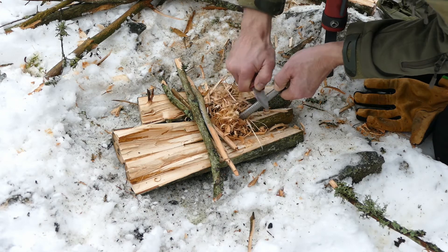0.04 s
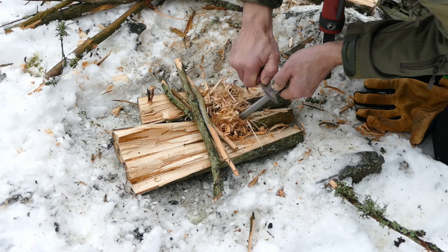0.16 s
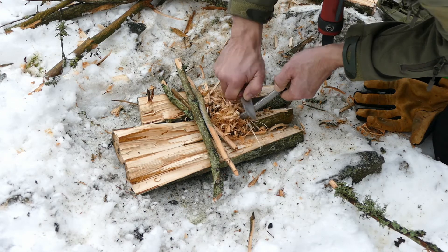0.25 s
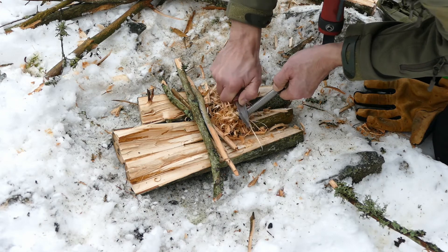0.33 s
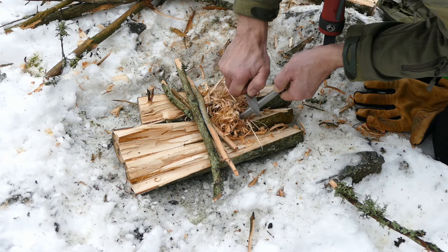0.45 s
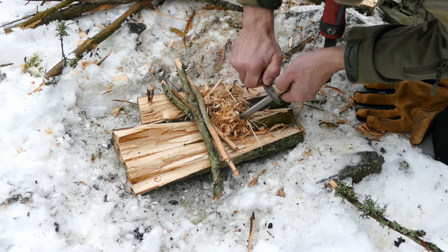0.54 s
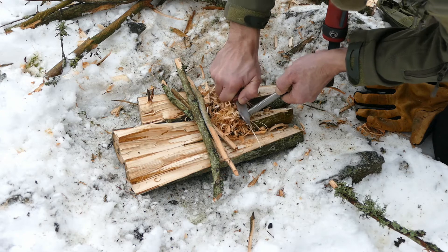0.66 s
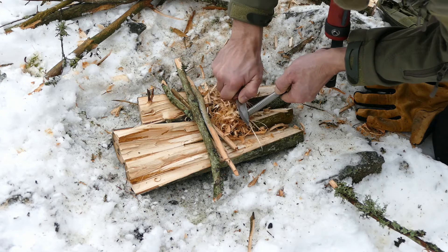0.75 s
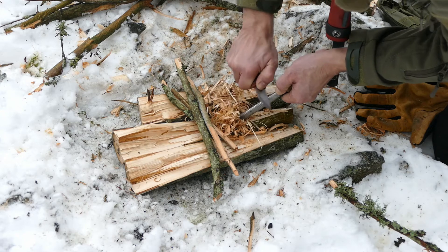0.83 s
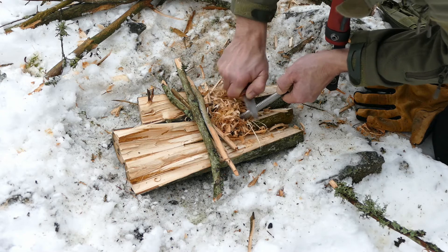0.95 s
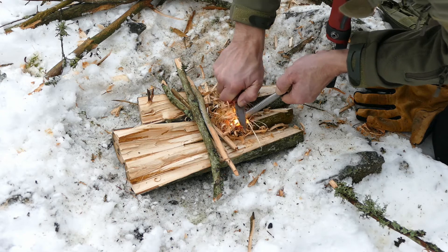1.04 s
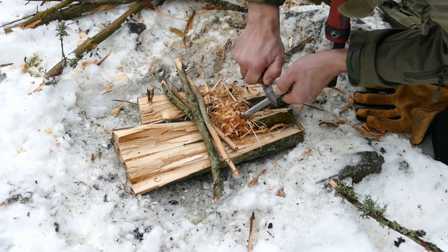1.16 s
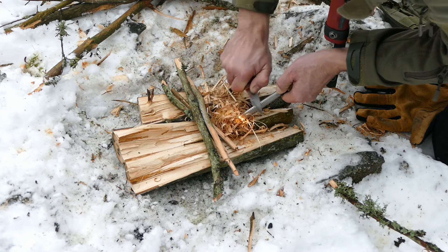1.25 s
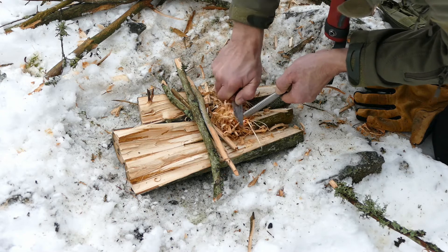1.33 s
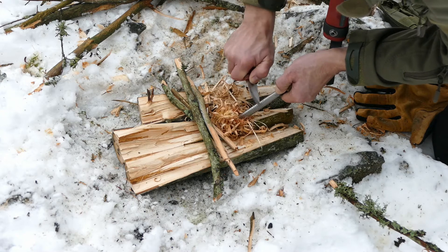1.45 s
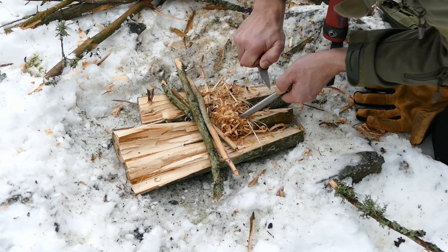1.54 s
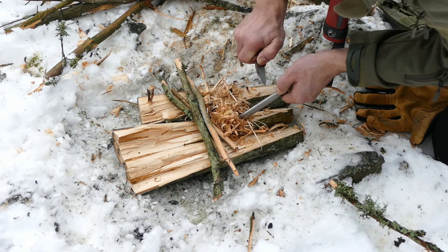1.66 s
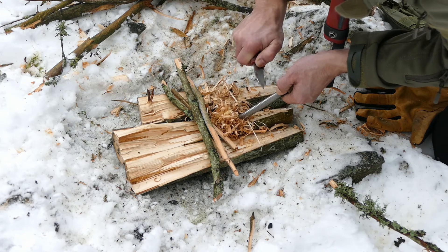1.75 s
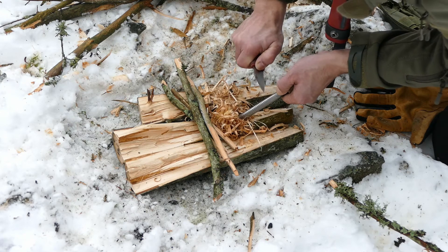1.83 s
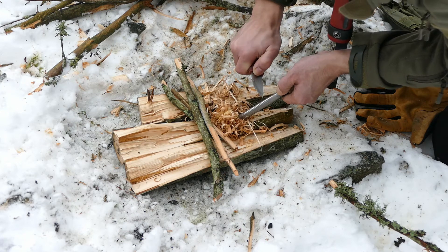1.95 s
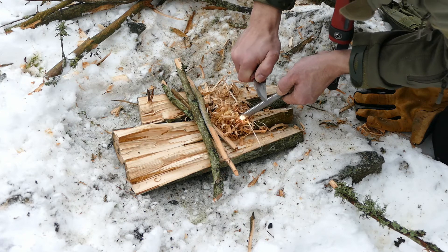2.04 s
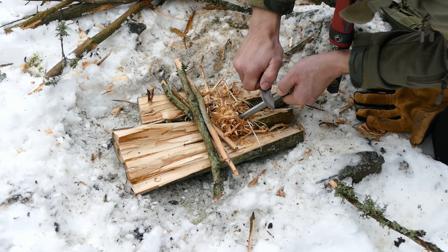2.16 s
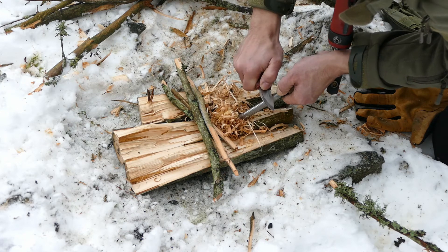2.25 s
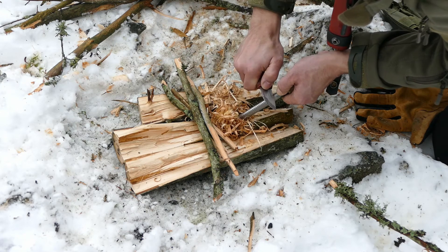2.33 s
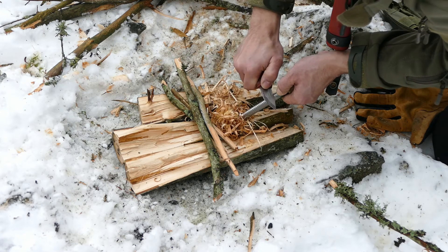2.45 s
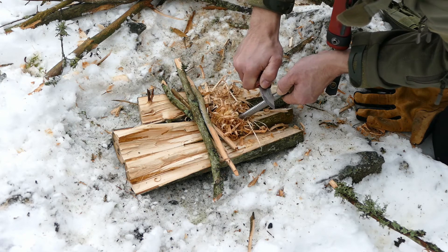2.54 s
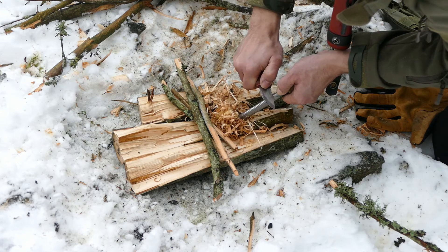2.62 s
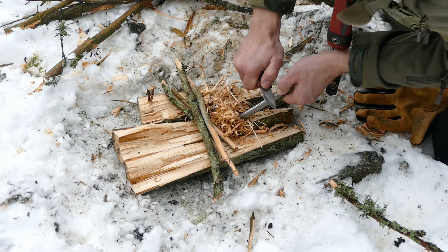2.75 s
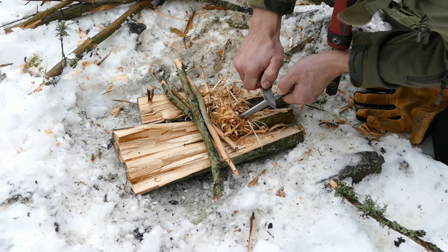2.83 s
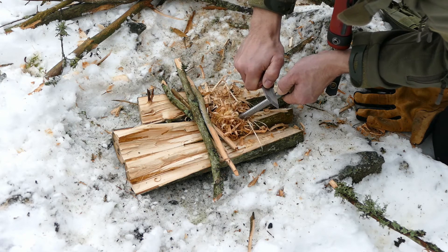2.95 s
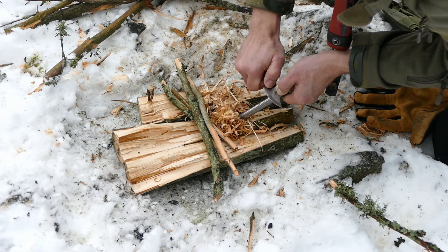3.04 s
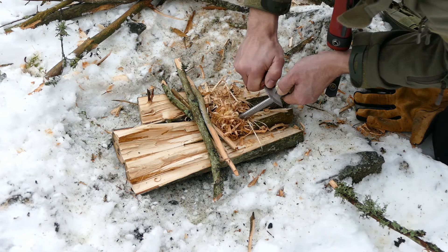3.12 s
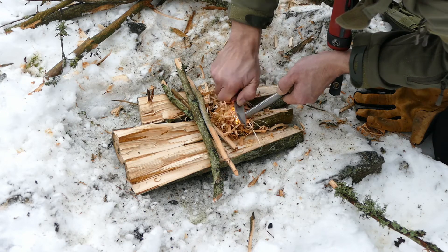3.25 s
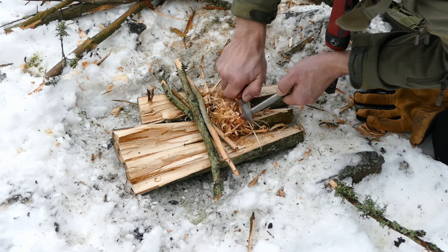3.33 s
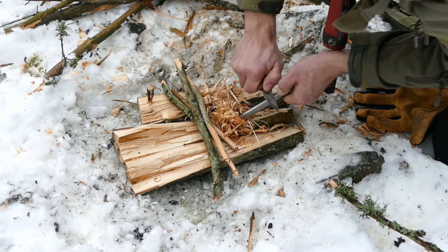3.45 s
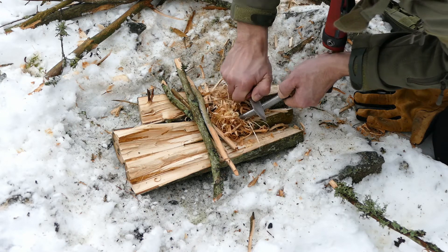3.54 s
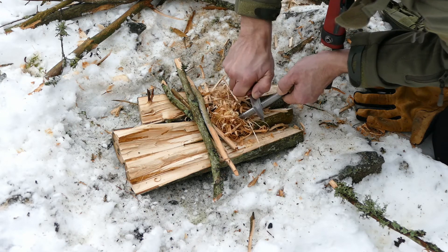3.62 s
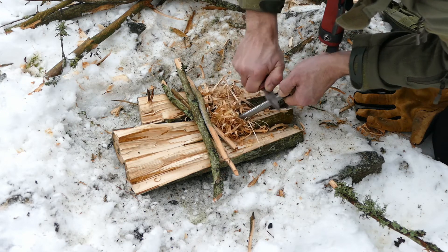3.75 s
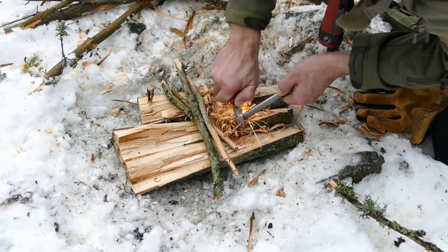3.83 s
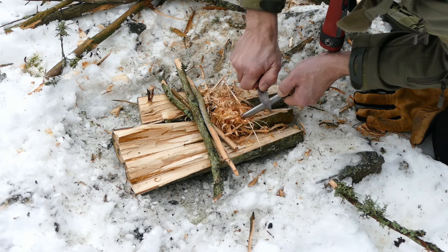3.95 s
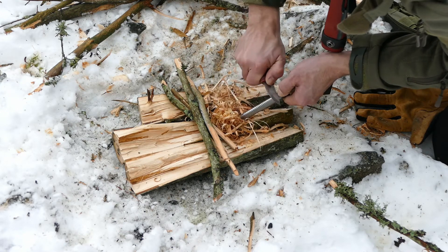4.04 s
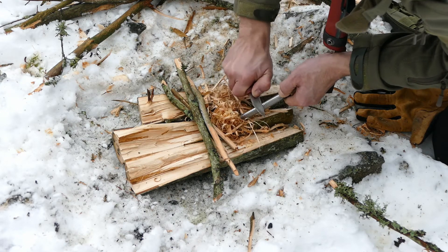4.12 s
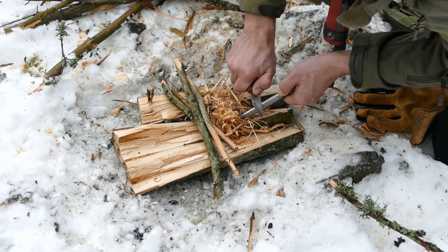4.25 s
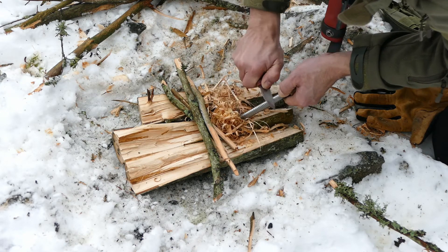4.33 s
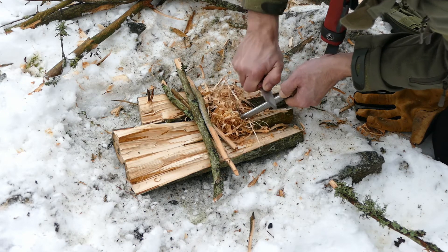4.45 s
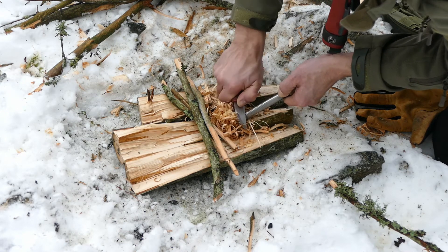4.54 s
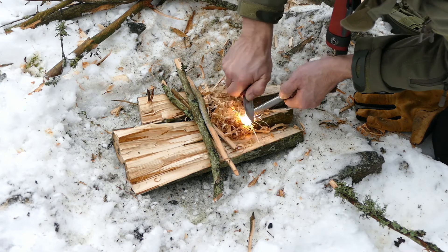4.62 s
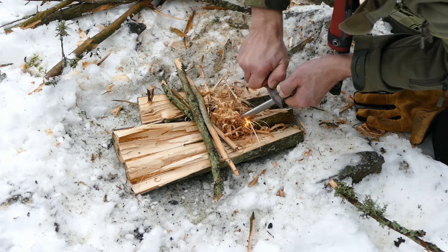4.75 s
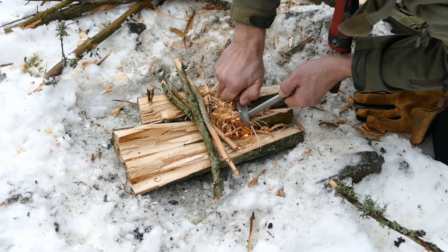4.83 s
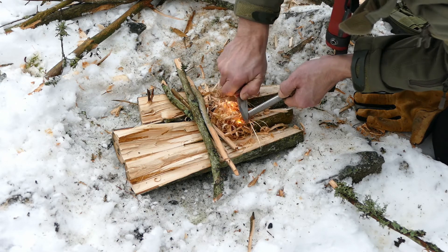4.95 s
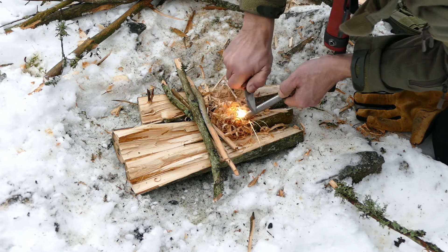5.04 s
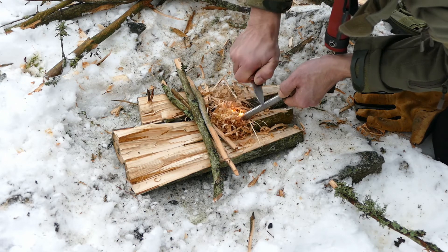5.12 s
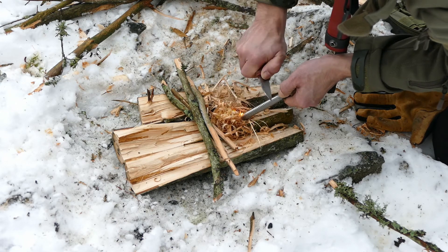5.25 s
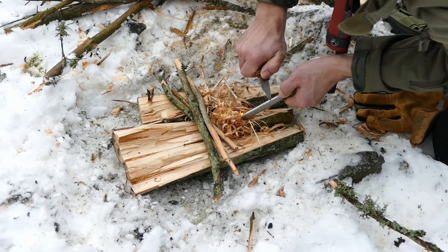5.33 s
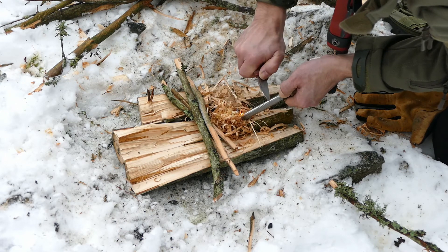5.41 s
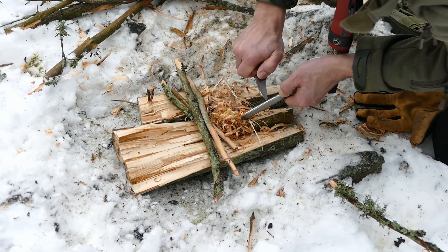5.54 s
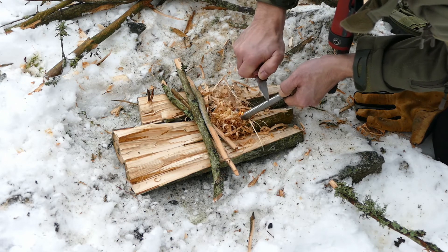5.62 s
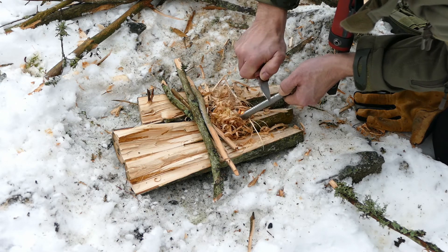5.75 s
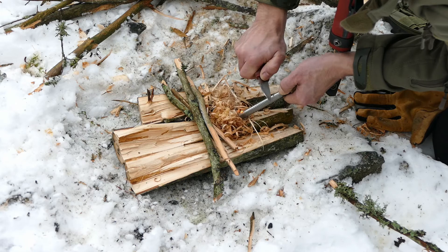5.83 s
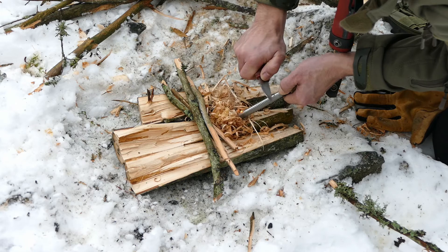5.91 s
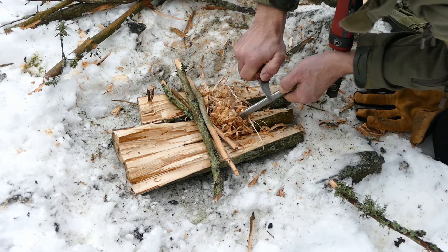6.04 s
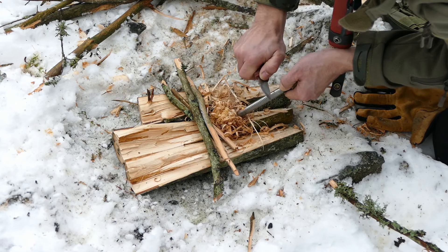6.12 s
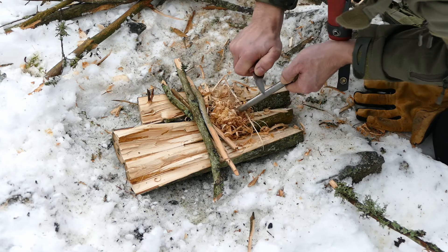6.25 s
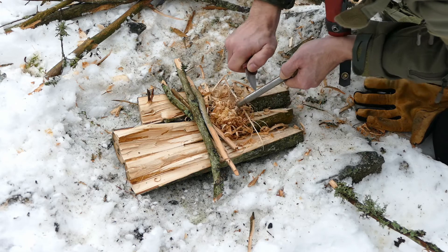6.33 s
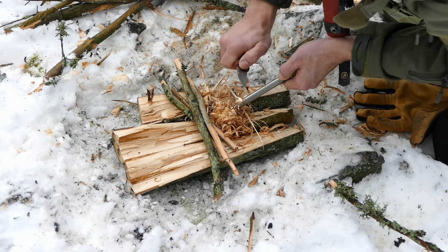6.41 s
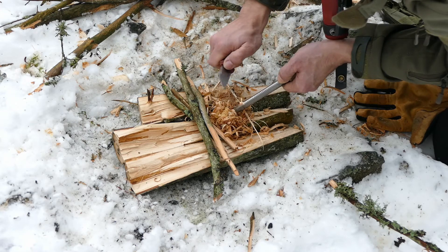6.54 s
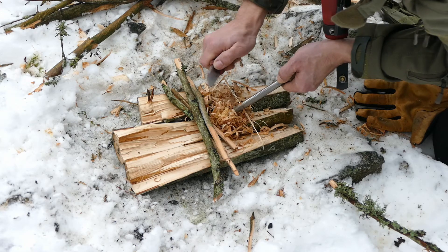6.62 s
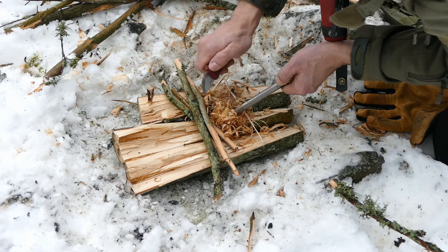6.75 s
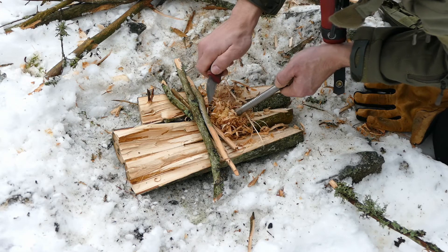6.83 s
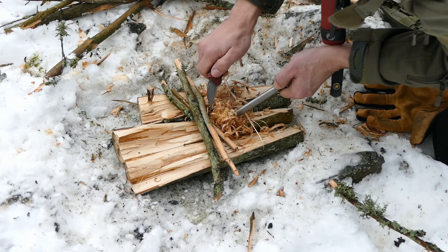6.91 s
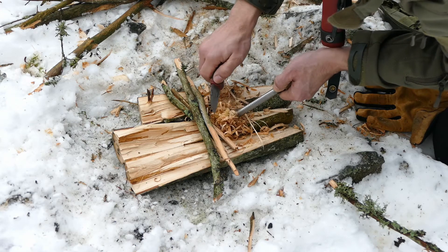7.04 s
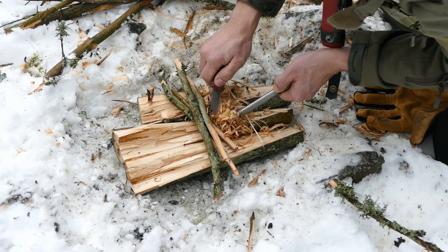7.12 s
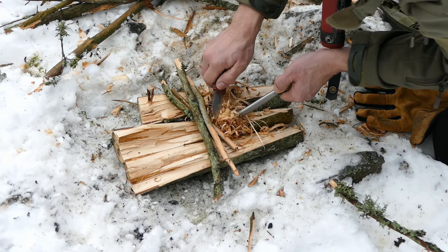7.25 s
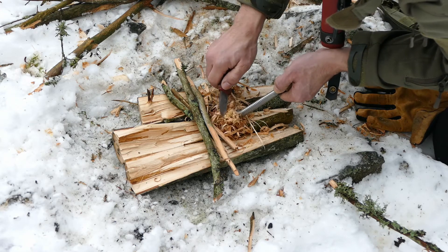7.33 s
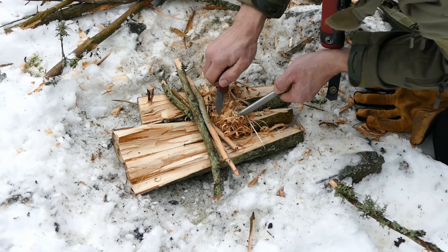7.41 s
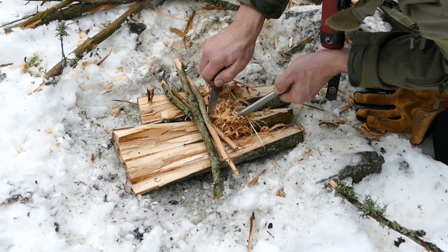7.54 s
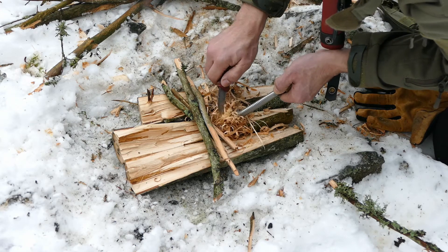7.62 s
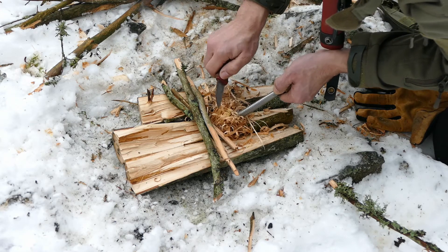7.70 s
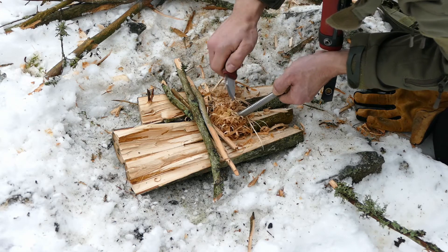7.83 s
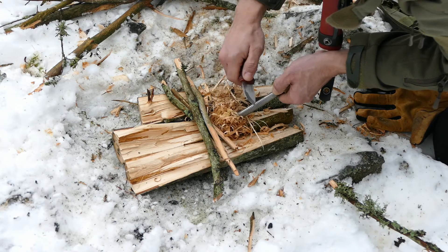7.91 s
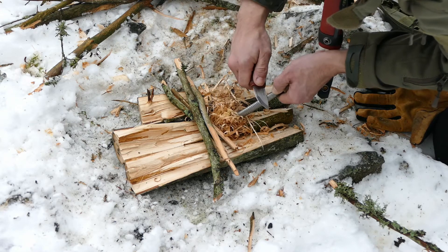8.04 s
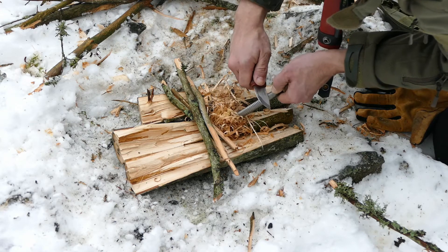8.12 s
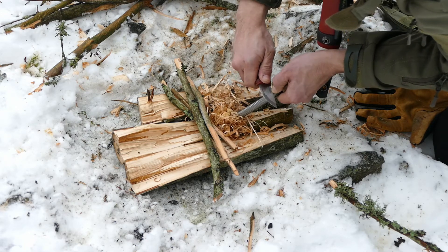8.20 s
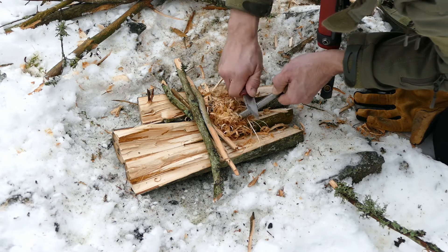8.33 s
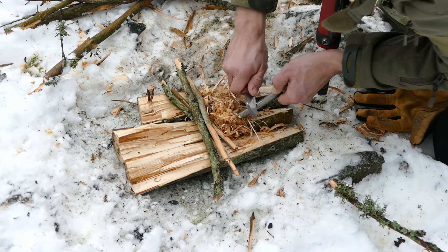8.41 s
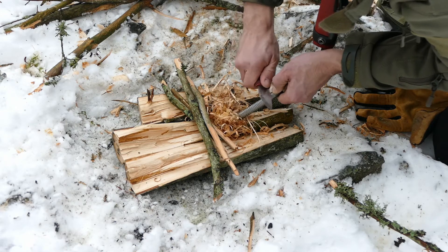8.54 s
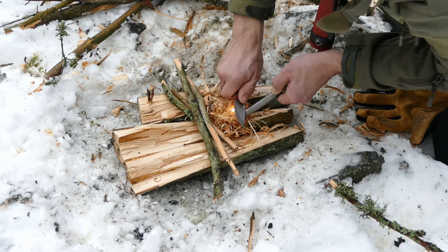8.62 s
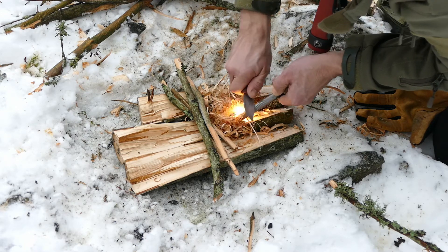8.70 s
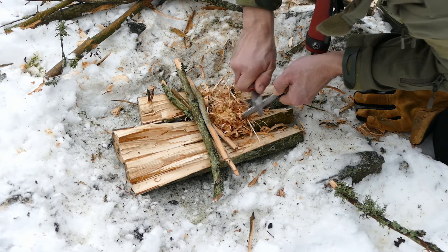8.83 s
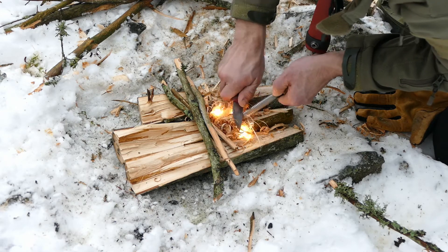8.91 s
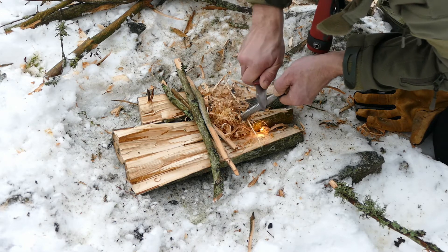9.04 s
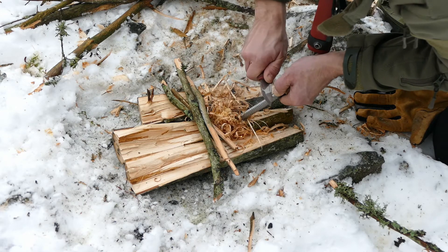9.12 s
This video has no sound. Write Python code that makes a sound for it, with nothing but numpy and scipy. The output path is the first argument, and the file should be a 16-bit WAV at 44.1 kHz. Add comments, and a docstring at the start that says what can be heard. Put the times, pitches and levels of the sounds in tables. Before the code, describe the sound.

A knife scrapes a metal rod in short rasping back-and-forth strokes outdoors, with fizzing sparks, dry shavings rustling and snapping, and pauses between bursts.

```python
"""Outdoors on snow, a knife is scraped back and forth along a ferro rod over dry wood shavings.
In each stroke the edge chatters over ridges in the rod: clicks excite damped modes of rod and blade.
Shaved metal fizzes as filtered random grains; the blade squeaks in wavering tones and taps the rod.
Shavings rustle in grains and snap in decaying noise bursts; a sleeve brushes; the air murmurs far off."""
import sys
import numpy as np
from scipy import signal
from scipy.fft import rfft, irfft
from scipy.io import wavfile
from scipy.ndimage import uniform_filter1d

SR = 44100
rng = np.random.default_rng(int(sys.argv[2]) if len(sys.argv) > 2 else 0)


def unload_audio(sound):
    """Save the sound as a 16-bit wav file, at the path given as the first command line argument."""
    columns = np.transpose(np.atleast_2d(sound))
    # keep every value between -1 and 1, then stretch to whole-number steps
    steps = np.round(np.clip(columns, -1, 1) * 32767)
    wavfile.write(sys.argv[1], SR, steps.astype(np.int16))


N = 404397
TIME = np.arange(N) / SR
STROKE = np.arange(-3528, 4410) / SR  # seconds around one stroke's own time


def undb(db):
    """Decibels to gain."""
    return 10 ** (np.asarray(db) / 20)


def unit(x):
    """Scale to rms 1."""
    return x / np.sqrt(np.mean(x ** 2) + 1e-18)


def add(out, start_s, x):
    """Mix x into out, starting at start_s."""
    i = int(round(start_s * SR))
    x, i = x[max(-i, 0):], max(i, 0)
    out[i:i + len(x)] += x[:len(out) - i]


def band(x, lo_hz, hi_hz, order=2):
    """Butterworth band-pass."""
    edges_hz = [lo_hz, min(hi_hz, SR / 2 - 1)]
    return signal.sosfilt(signal.butter(order, edges_hz, "band", fs=SR, output="sos"), x)


def colour(x, points, size=4096):
    """Minimum-phase filter whose gain passes through the (Hz, dB) points."""
    hz, db = np.transpose(points)
    bins_hz = np.fft.rfftfreq(size, 1 / SR)
    gain = undb(np.interp(np.log(bins_hz + 1), np.log(hz), db))
    # fold the cepstrum onto its causal half
    cepstrum = irfft(np.log(gain))
    cepstrum[1:size // 2] *= 2
    cepstrum[size // 2 + 1:] = 0
    response = irfft(np.exp(rfft(cepstrum)))[:size // 2]
    return signal.fftconvolve(x, response)[:len(x)]


def ring(x, hz, width_hz):
    """One damped mode, gain near 1 at its centre, high-passed because it radiates little far below it."""
    r, w = np.exp(-np.pi * width_hz / SR), 2 * np.pi * hz / SR
    y = signal.lfilter([2 * (1 - r) * np.sin(w)], [1, -2 * r * np.cos(w), r * r], x)
    return signal.lfilter([1, -1], [1, -np.exp(-w / 2)], y)


def slide(x, hz, width_hz):
    """A resonance whose centre moves with hz."""
    turn, r = np.exp(2j * np.pi * np.cumsum(hz) / SR), np.exp(-np.pi * width_hz / SR)
    return (turn * signal.lfilter([1 - r], [1, -r], x / turn)).imag


def walk(rate_hz):
    """Random wander of rms 1, heading for a new value rate_hz times per second."""
    k = int(SR / rate_hz)
    steps = np.repeat(rng.standard_normal(N // k + 1), k)
    return unit(uniform_filter1d(steps, k)[:N])


def swell(start_s, length_s, db, attack_s, slope_db_per_s, release_s):
    """Gain that climbs 20 dB per attack_s up to db at start_s, drifts, then drops 20 dB per release_s."""
    t = TIME - start_s
    ramps = np.maximum(-t, 0) / attack_s + np.maximum(t - length_s, 0) / release_s
    return undb(db + slope_db_per_s * np.clip(t, 0, length_s) - 20 * np.minimum(ramps, 10))


def crackle(points, grains_per_s, spread_db, smooth_db, patchy_db):
    """Tiny clicks of very uneven size over a smooth hiss, in wandering patches."""
    sizes = undb(spread_db * np.minimum(rng.exponential(size=N), 4))
    grains = (rng.random(N) < grains_per_s / SR) * sizes * rng.choice([-1, 1], N)
    hiss = undb(smooth_db) * rng.standard_normal(N)
    return unit(colour(unit(grains) + hiss, points)) * undb(patchy_db * walk(120))


# Spectrum of the distant murmur. Each row: frequency in Hz, relative level in dB.
AIR_COLOUR = [(15, -33.5), (25, -3.5), (97, -9), (166, -13), (256, -9), (285, -7), (344, -4), (545, -3.5),
              (591, -2.5), (962, -5.5), (1890, -21), (2220, -18), (5140, -35.5), (8140, -33), (16000, -28)]


def air(level_db=-58, swell_db=-2.5):
    """Far-off outdoor murmur: coloured noise that swells a little."""
    murmur = unit(colour(rng.standard_normal(N), AIR_COLOUR))
    return undb(level_db + swell_db * walk(0.87)) * murmur


# Sleeve brushes. Each row: start in seconds, length in seconds, level in dB.
BRUSH_EVENTS = [(0.706, .02, -61.5), (8.082, 0.041, -65), (9.107, 0.026, -61)]


def sleeve(lo_hz=1800, hi_hz=6500, attack_s=0.039, release_s=.06):
    """Cloth rubs softly on cloth: band-passed noise as the arm shifts."""
    rub = sum(swell(s, length_s, db, attack_s, 0, release_s) for s, length_s, db in BRUSH_EVENTS)
    return rub * unit(band(rng.standard_normal(N), lo_hz, hi_hz))


def ground(x, wet_db=-24, t60_s=0.099):
    """Logs and trodden snow scatter a faint, short echo: decaying noise after a 3 ms gap."""
    t = TIME[:8192]
    noise = band(rng.standard_normal(len(t)), 300, 5000, order=1)
    tail = noise * np.exp(-np.log(1000) * t / t60_s) * (t > .003)
    echo = signal.fftconvolve(x, tail / np.sqrt(np.sum(tail ** 2)))[:N]
    return x + undb(wet_db) * echo


# Stirs of the shavings. Each row: start in seconds, length in seconds, level in dB before gain.
STIR_EVENTS = [(1.288, 0.062, -49.5), (1.487, .12, -54.5), (1.932, 0.1, -50), (2.098, 0.096, -54.5),
               (2.246, 0.25, -57.5), (4.929, 0.24, -53), (5.32, 0.23, -67), (5.587, 0.29, -66.5),
               (6.11, 0.12, -73.5), (6.478, 0.075, -63.5), (7.195, 0.11, -79.5), (7.66, 0.21, -75)]
# Rustle spectrum. Each row: frequency in Hz, relative level in dB.
RUSTLE_SPECTRUM = [(80, -17.5), (600, -16.5), (1700, -6.5), (2400, -12.5), (3000, -6), (4700, -19),
                   (6000, -7.5), (8200, -1.5), (10200, -15.5), (11600, -8), (14300, -17), (15700, -8)]


def rustle(gain_db=1, attack_s=0.013, settle_db_per_s=-30, release_s=.025, rest_db=-82):
    """Dry curls of wood tick against each other at each stir, then settle."""
    stir = undb(rest_db) + sum(swell(s, length_s, db, attack_s, settle_db_per_s, release_s)
                               for s, length_s, db in STIR_EVENTS)
    ticks = crackle(RUSTLE_SPECTRUM, grains_per_s=450, spread_db=4.0, smooth_db=-8.0, patchy_db=5.5)
    return undb(gain_db) * stir * ticks


# Snaps of dry shavings. Each row: start in seconds, peak in dB before gain, t60 in seconds.
SNAP_EVENTS = [(0.957, -28, 0.0047), (1.328, -24, 0.0046), (1.566, -38, 0.025), (1.577, -31.5, 0.015),
               (1.599, -39, 0.012), (1.985, -30, 0.048), (2.145, -24.5, 0.016), (2.225, -34, 0.019),
               (2.33, -34, 0.0061), (2.477, -33.5, 0.0064), (3.196, -48, .008), (3.951, -23.5, 0.0092),
               (4.574, -19, 0.019), (4.588, -28, 0.0094), (4.825, -22.5, 0.024), (5.234, -30, 0.013),
               (5.442, -31, 0.018), (5.481, -33, 0.035), (5.511, -31.5, 0.019), (6.331, -29, 0.029),
               (6.344, -22, 0.022), (6.356, -12.5, 0.019), (6.361, -28, .012), (6.383, -12.5, 0.0072),
               (6.474, -34, 0.068), (6.526, -41, 0.0092), (6.751, -25, 0.021), (6.756, -21.5, 0.016),
               (7.753, -33, 0.024)]
# Snap spectrum. Each row: frequency in Hz, relative level in dB.
SNAP_SPECTRUM = [(30, -34), (120, -11.5), (450, -4.5), (1400, -7.5), (2400, -6), (4200, -10.5),
                 (5000, -8.5), (7000, -3.5), (8500, 0.5), (10000, -14), (12700, -3.5), (14500, -20),
                 (15700, -12.5)]


def snaps(crack=3.7, gain_db=1):
    """A dry fibre cracks in one click and splinters in briefly decaying noise."""
    out, t = np.zeros(N), TIME[:2048]
    for s, db, t60_s in SNAP_EVENTS:
        burst = rng.standard_normal(len(t)) * np.exp(-np.log(1000) * t / t60_s)
        burst[0] += crack
        sound = colour(burst, SNAP_SPECTRUM)
        add(out, s, undb(db + gain_db) * sound / abs(sound).max())
    return out


# Modes of rod and blade, damped by the hands. Each row: nominal frequency in Hz, nominal width in Hz,
# relative level in dB when pushed, when pulled, when tapped.
ROD_MODES = [(760, 370, -9, -14.5, -28), (962.5, 89, 2.5, -5, -34), (1190, 100, -3.5, -8.5, 7.5),
             (1464, 154, -2.5, 3, -5), (1658, 215, -3.5, 1.5, 9.5), (1986, 222, -6, -0.5, 3),
             (3130, 360, -60.5, -0.5, 0.5), (4083, 327, -19.5, 0.5, -2.5), (5250, 620, -21, -11, -10.5),
             (6780, 700, -22.5, -12.5, -14), (7450, 190, -17.5, 2, -9.5), (8380, 190, -23, -14.5, -14.5),
             (11800, 1600, -45, -25, -30.5), (15300, 2000, -47, -56, -44)]


def rod(bites, sharp_bites, column, grit, crumble_s, detune, damping, body_hz=1320, edge_hz=2600):
    """Each bite is a click plus crumbling grit; returns the ring of the body, middle and edge modes."""
    rings = np.zeros((3, len(bites)))
    for k, (hz, width_hz, *dbs) in enumerate(ROD_MODES):
        # the high modes answer to sharp_bites only
        clicks = sharp_bites if hz > edge_hz else bites
        crumble = signal.lfilter([1], [1, -np.exp(-1 / (crumble_s * SR))], clicks)
        crumble = crumble / np.sqrt(crumble_s * SR / 2)
        drive = (-1) ** k * clicks + grit * crumble * rng.standard_normal(len(bites))
        # each mode is detuned a little at random for every stroke or tap
        mode_hz = hz * (1 + detune * rng.standard_normal())
        group = np.searchsorted([body_hz, edge_hz], hz)
        rings[group] += undb(dbs[column]) * ring(drive, mode_hz, width_hz * damping)
    return band(rings[0], 490, 2050), band(rings[1], 810, 5500), band(rings[2], 2000, 22000)


# Touches of blade on rod. Each row: start in seconds, peak in dB before gain, edge-mode gain in dB.
TAP_EVENTS = [(0.474, -38, -2), (2.407, -37.5, 5.5), (3.655, -32.5, -8), (4.145, -35, -8), (4.315, -41, -5),
              (6.0254, -37.5, -10.5), (6.102, -38.5, 8), (6.284, -20.5, 13), (6.3, -32, 7),
              (6.3114, -31.5, 8), (6.888, -35, 3), (6.9105, -28.5, -9), (6.9415, -40, -10),
              (7.9404, -23.5, 12.5), (8.306, -36.5, -11), (8.3909, -50, 0), (8.447, -36, -3)]


def taps(gain_db=1):
    """Light touches of steel on the rod: one click each, ringing longer than under a pushed blade."""
    out, click = np.zeros(N), signal.unit_impulse(2048)
    for s, db, bright_db in TAP_EVENTS:
        body, middle, edge = rod(click, click, column=2, grit=1.0, crumble_s=0.0011,
                                 detune=0.025, damping=0.77)
        sound = body + middle + undb(bright_db) * edge
        add(out, s, undb(db + gain_db) * sound / abs(sound).max())
    return out


# Blade squeaks. Each row: centre in seconds, length in seconds, nominal pitch in Hz, level in dB.
SQUEAK_EVENTS = [(0.784, 0.027, 3340, -43), (1.023, 0.027, 3170, -45), (3.272, 0.021, 3260, -41.5),
                 (4.242, 0.018, 3340, -41), (4.26, 0.015, 3230, -41), (4.283, 0.0295, 3380, -46),
                 (4.543, 0.024, 3230, -30.5), (8.707, 0.027, 3270, -45)]


def squeaks(second_db=-18, third_db=-28, rough_db=6.0):
    """Brief stick-slip whistles: three harmonics, rough in pitch and level."""
    out, wobble, grip = np.zeros(N), .012 * walk(900), undb(rough_db * walk(500))
    for s, length_s, hz, db in SQUEAK_EVENTS:
        start = int(s * SR)
        now = slice(start, start + int(length_s * SR))
        phase = 2 * np.pi * np.cumsum(hz * (1 + wobble[now])) / SR
        tone = np.sin(phase) + undb(second_db) * np.sin(2 * phase) + undb(third_db) * np.sin(3 * phase)
        tone = unit(grip[now] * tone) * signal.windows.tukey(len(tone), .5)
        add(out, s - length_s / 2, undb(db) * tone)
    return out


# Spark showers that burn on. Each row: start in seconds, length in seconds, level in dB before gain.
SPARK_EVENTS = [(0.943, 0.094, -43.5), (1.131, 0.036, -46.5), (1.232, 0.18, -44), (3.196, 0.017, -45),
                (3.363, 0.093, -52.5), (3.747, 0.027, -41), (3.833, 0.04, -43), (3.923, 0.025, -51.5),
                (4.565, 0.023, -39), (4.803, 0.067, -40), (4.925, 0.1, -46.5), (8.596, 0.073, -42),
                (8.83, 0.071, -43)]


def spark_fizz(attack_s=0.025, burn_db_per_s=-55, release_s=0.049):
    """Level of the sparks: a shower flares, burns down and goes out."""
    return sum(swell(s, length_s, db, attack_s, burn_db_per_s, release_s)
               for s, length_s, db in SPARK_EVENTS)


def pull_fizz(attack_s=0.045, sag_db_per_s=-30, release_s=0.087):
    """Level of the return fizz: drawn back, the edge shaves lightly and eases off the rod."""
    return sum(swell(s, length_s, db, attack_s, sag_db_per_s, release_s)
               for s, length_s, *_, db in PULL_STROKES)


def push_fizz(lead_s=0.058, build_db=8, attack_s=.025, sag_db_per_s=-50, release_s=0.014):
    """Level of the forward fizz: the edge shaves harder up to the bite, then on until it leaves the rod."""
    total = 0
    for s, _, _, run_out_s, *_, db in PUSH_STROKES:
        lead = swell(s - lead_s, lead_s, db - build_db, attack_s, build_db / lead_s, release_s)
        total = total + np.maximum(lead, swell(s, run_out_s, db, attack_s, sag_db_per_s, release_s))
    return total


# Fizz spectrum. Each row: frequency in Hz, relative level in dB.
FIZZ_SPECTRUM = [(80, -16.5), (300, 1), (700, -2.5), (1600, -3.5), (2450, -3.5), (3100, 0), (4700, -3.5),
                 (6000, -1.5), (7800, 4), (9000, -0.5), (10200, -13), (11600, -3), (14300, -12),
                 (15700, -6.5)]


def fizz(gain_db=1, sheen_db=3, sheen_hz=6800, sheen_width_hz=1300, roam=0.22, grate_db=9):
    """Flakes of the rod tear off and burn in a dense hiss with a roaming resonance."""
    amount = np.sqrt(push_fizz() ** 2 + pull_fizz() ** 2 + spark_fizz() ** 2)
    flakes = amount * crackle(FIZZ_SPECTRUM, grains_per_s=5000, spread_db=4.5, smooth_db=-4, patchy_db=3.0)
    sheen = slide(flakes, sheen_hz * np.exp(roam * walk(22)), sheen_width_hz)
    # the flakes also set the rod grating, now in one mode, now in another
    grate = sum(ring(flakes, hz, width_hz) * undb(push_db / 2) * walk(25)
                for hz, width_hz, push_db, *_ in ROD_MODES[:8])
    return undb(gain_db) * (flakes + undb(sheen_db) * sheen + undb(grate_db) * grate)


def ridges(rate_hz, jitter, scatter_db):
    """One click per ridge that the edge jumps; before jitter, one falls on the stroke's own time."""
    travel = np.cumsum(rate_hz) / SR
    at = np.flatnonzero(np.diff(np.floor(travel - np.interp(0, STROKE, travel))))
    chance = rng.standard_normal((128, 2))[:len(at)]
    shift = (jitter * SR / rate_hz[at] * chance[:, 0]).astype(int)
    at = np.clip(at + shift, 0, len(STROKE) - 1)
    clicks = np.zeros(len(STROKE))
    clicks[at] = undb(scatter_db * chance[:, 1])
    return clicks


def blend(layers, dbs):
    """Sum the layers of a stroke, each with its energy set as a level over 60 ms."""
    span = .06 * SR
    return sum(undb(db) * x / np.sqrt(np.sum(x ** 2) / span + 1e-18) for x, db in zip(layers, dbs))


# Return strokes. Each row: first contact in seconds, length in seconds, mid-stroke ridges per second,
# body, middle, edge and thud levels in dB, fizz level in dB before gain.
PULL_STROKES = [(0.003, 0.023, 280, -64, -52.5, -66.5, -70, -65),
                (0.3992, 0.038, 210, -42.5, -38.5, -56, -53.5, -60.5),
                (0.7488, 0.026, 267, -43.5, -34.5, -42.5, -50.5, -56),
                (1.0452, 0.033, 310, -36, -31.5, -31, -47, -56),
                (3.303, 0.03, 287, -35.5, -31, -34, -45, -50),
                (3.6087, 0.029, 168, -49, -38.5, -40.5, -58, -78),
                (3.874, 0.027, 248, -31.5, -33.5, -39.5, -49, -55),
                (4.2363, 0.038, 147, -56, -43.5, -47, -59, -63),
                (4.6007, 0.041, 258, -37.5, -33.5, -37.5, -53, -45.5),
                (8.403, 0.029, 196, -52.5, -35.5, -38.5, -63, -65),
                (8.6593, 0.037, 237, -41, -32, -31.5, -60, -52),
                (8.927, 0.042, 176, -36.5, -34, -38, -48.5, -53)]


def pulls(swell_db=3.5, fade_db=4, release_s=0.077, lead_db=-18, lead_s=0.04, quickening=.5, edge_power=1.9):
    """Drawn back, the edge catches after a faint lead-in and chatters ever faster over the ridges."""
    out, t = np.zeros(N), STROKE
    for s, length_s, rate_hz, *dbs, _ in PULL_STROKES:
        gone = t / length_s
        inside = np.clip(gone, 0, 1)
        arc_db = swell_db * np.sin(np.pi * inside) - fade_db * inside
        force = undb(arc_db) * np.exp(-np.maximum(gone - 1, 0) / release_s)
        force = np.where(t < -.002, undb(lead_db) * np.exp(-abs(t) / lead_s), force)
        clicks = ridges(rate_hz * np.exp(quickening * (inside - .5)), jitter=0.043, scatter_db=2.5)
        rings = rod(clicks * force, clicks * force ** edge_power, column=1, grit=1.0,
                    crumble_s=0.0021, detune=0.045, damping=0.76)
        thud = band(clicks * force, 270, 580)
        add(out, s + t[0], blend([*rings, thud], dbs))
    return out


# Forward strokes. Each row: hardest bite in seconds, rise, fall and run-out in seconds, ridges per second
# at the bite, body, middle, edge and thud levels in dB, fizz level in dB before gain.
PUSH_STROKES = [(0.1805, 0.014, 0.0086, 0.058, 249, -35, -44, -48.5, -41.5, -49.5),
                (0.5847, 0.013, 0.0086, 0.042, 288, -28.5, -48.5, -51, -39.5, -47),
                (0.904, 0.013, 0.0082, 0.031, 340, -26, -38, -43, -38.5, -48),
                (1.2054, 0.013, 0.012, 0.027, 326, -32, -34, -42, -39.5, -42.5),
                (3.168, 0.01, 0.0079, 0.026, 372, -27, -33, -37.5, -41, -49.5),
                (3.4591, 0.012, 0.0011, 0.0056, 192, -28.5, -42.5, -49, -43, -47),
                (3.7318, 0.0078, 0.013, 0.039, 412, -24, -31, -34, -39, -49.5),
                (4.0781, 0.012, 0.002, 0.0041, 216, -30.5, -44.5, -49, -41.5, -45),
                (4.4473, 0.011, 0.01, 0.0324, 350, -23, -34, -38.5, -37, -46.5),
                (4.758, 0.012, 0.0098, 0.024, 332, -21, -31.5, -38.5, -35.5, -45),
                (8.262, 0.013, 0.01, 0.013, 227, -46, -47, -57.5, -53.5, -48),
                (8.5424, 0.011, 0.0096, 0.036, 294, -32.5, -30.5, -40, -43.5, -47),
                (8.8084, 0.01, 0.01, 0.04, 358, -25, -30, -30, -40.5, -45.5)]


def pushes(shape=1.7, skirt_db=-12, skirt_reach=1.91, slowing_s=.05, edge_power=1.4,
           thud_hz=350, end_hz=120, thud_width_hz=90, drag=0.026, sag=0.294):
    """The edge bites hardest in mid-stroke, then slows and runs out toward the tip of the rod."""
    out, t = np.zeros(N), STROKE
    for s, rise_s, fall_s, run_out_s, rate_hz, *dbs, _ in PUSH_STROKES:
        reach = abs(t) / np.maximum(np.where(t < 0, rise_s, fall_s), 1 / SR)
        force = np.exp(-reach ** shape) + undb(skirt_db) * np.exp(-(reach / skirt_reach) ** 2)
        slowing_hz = rate_hz / (1 + (np.maximum(t, 0) / slowing_s) ** 2)
        clicks = ridges(slowing_hz, jitter=0.037, scatter_db=3.0)
        rings = rod(clicks * force, clicks * force ** edge_power, column=0, grit=0.35,
                    crumble_s=0.00087, detune=0.033, damping=1)
        # toward its free tip the rod gives way more softly, so its thud drops in pitch;
        # strokes below 300 ridges/s start lower than thud_hz
        gone = np.maximum(t, 0) / max(run_out_s, 1 / SR)
        drop = np.exp(-(gone / 0.91) ** 2.6) * min(rate_hz / 300, 1)
        pitch_hz = end_hz + (thud_hz - end_hz) * drop
        lean = np.where(t < 0, force, np.exp(-1.1 * gone - (gone / 2.1) ** 6))
        shove = lean * (clicks + drag * rng.standard_normal(len(t)))
        thud = band(slide(shove, pitch_hz, thud_width_hz), 120, 490)
        # the body ring curves down with it
        slowed_s = t - sag * np.cumsum(1 - np.exp(-gone ** 2)) / SR
        body = np.interp(slowed_s, t, rings[0])
        add(out, s + t[0], blend([body, *rings[1:], thud], dbs))
    return out


def strokes():
    """All that the edge draws from the rod: hard pushes, lighter pulls, fizz and squeaks."""
    return pushes() + pulls() + fizz() + squeaks()


def scene():
    """Knife, rod and shavings with their ground echo, plus open air and sleeve; one channel."""
    close = strokes() + taps() + rustle() + snaps()
    return (ground(close) + air() + sleeve())[None]


def record(dry, top_hz=16000):
    """Steep elliptic low-pass: the top is cut above top_hz."""
    return signal.sosfilt(signal.ellip(10, .2, 70, top_hz, fs=SR, output="sos"), dry)


dry = scene()
out = record(dry)
unload_audio(out)
```